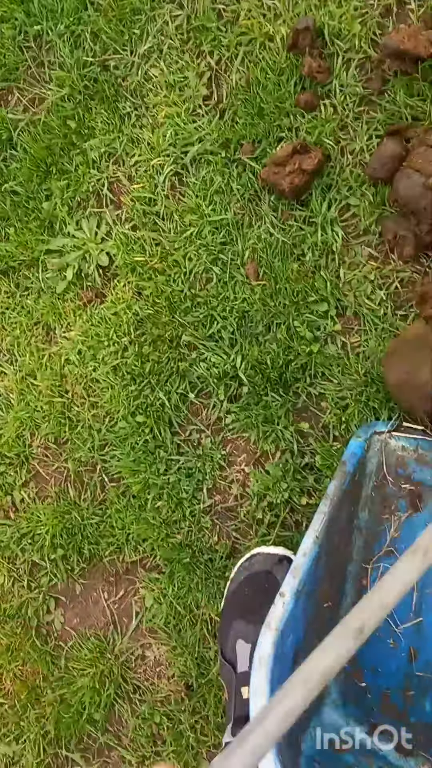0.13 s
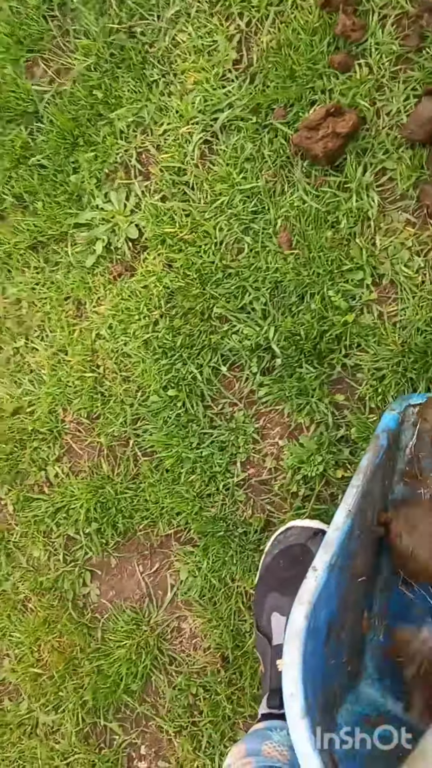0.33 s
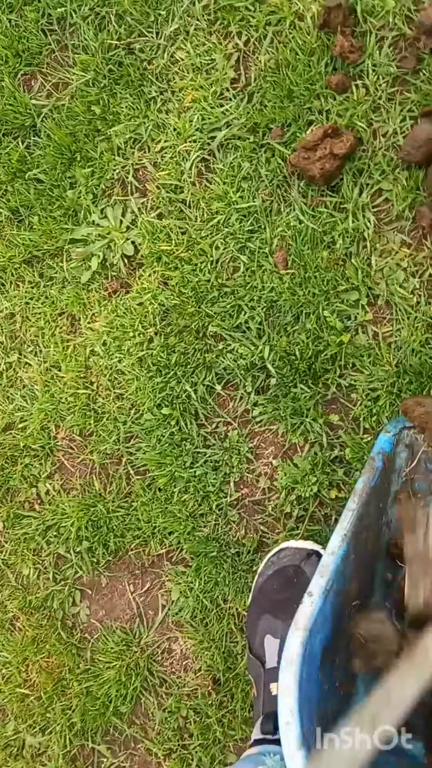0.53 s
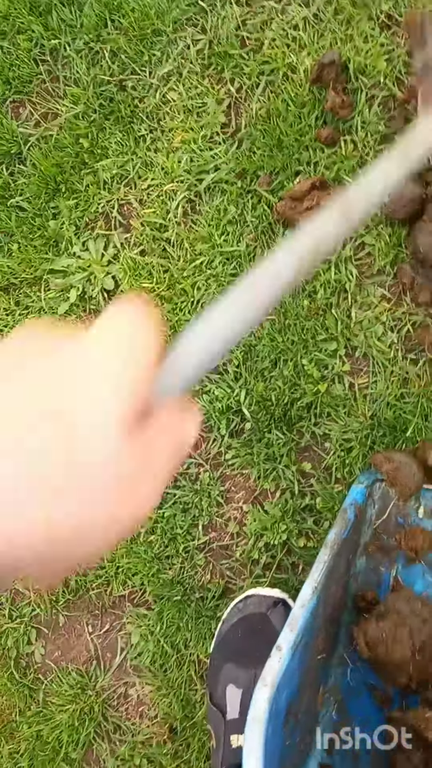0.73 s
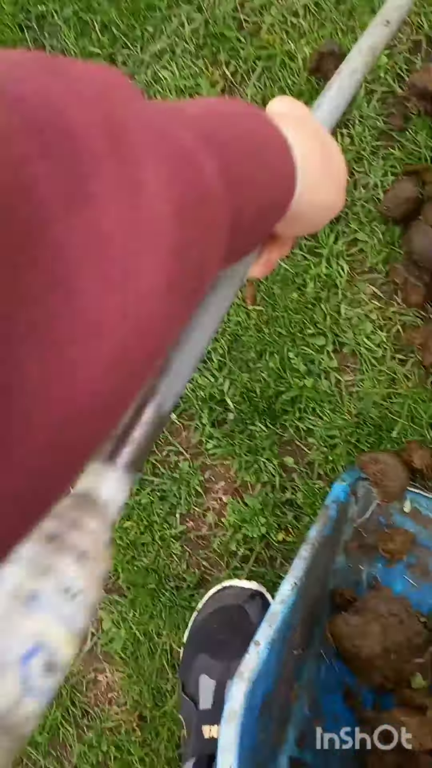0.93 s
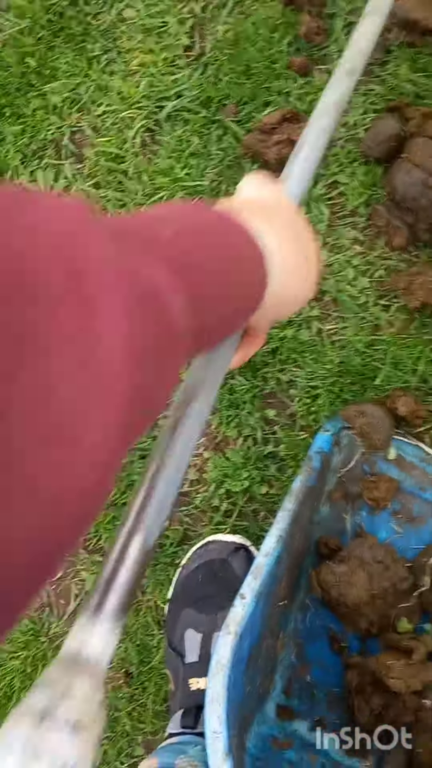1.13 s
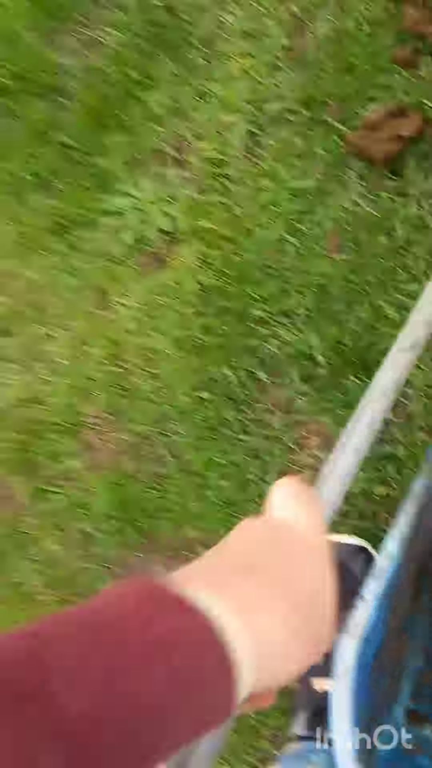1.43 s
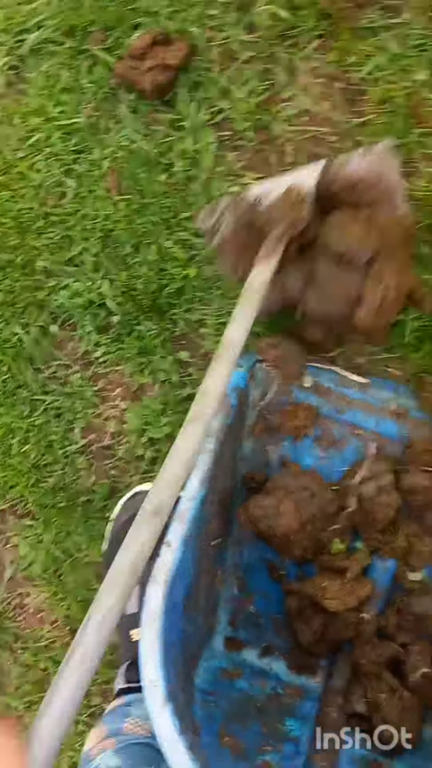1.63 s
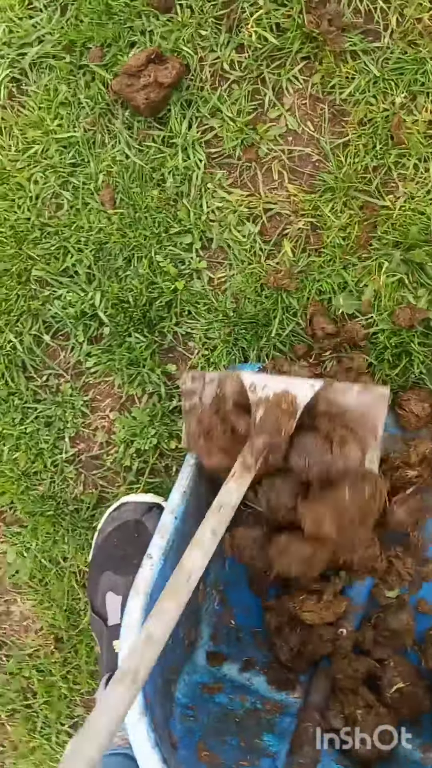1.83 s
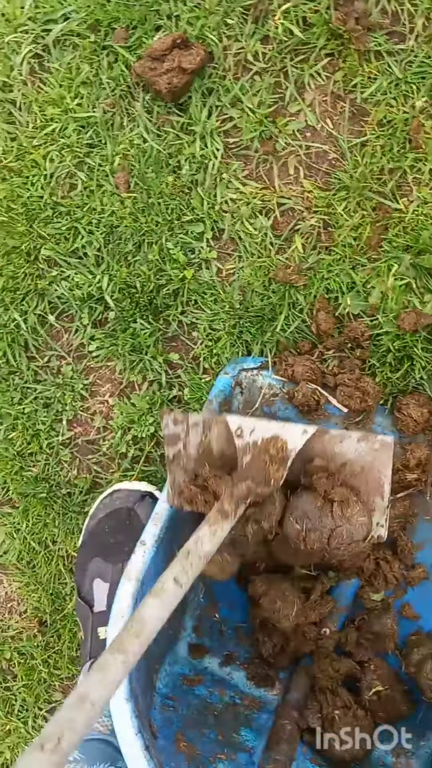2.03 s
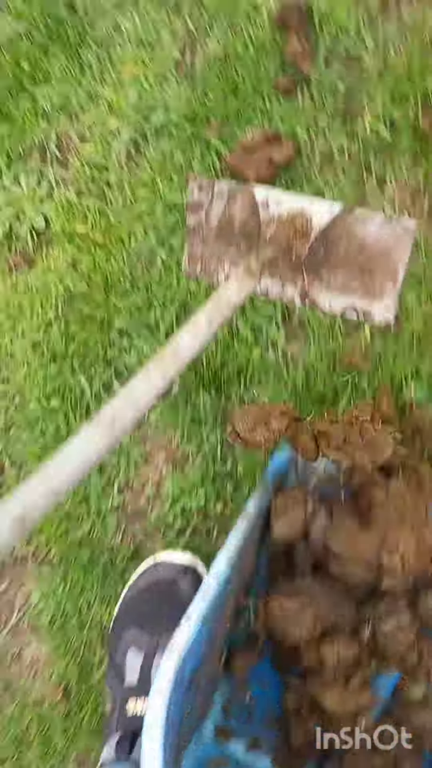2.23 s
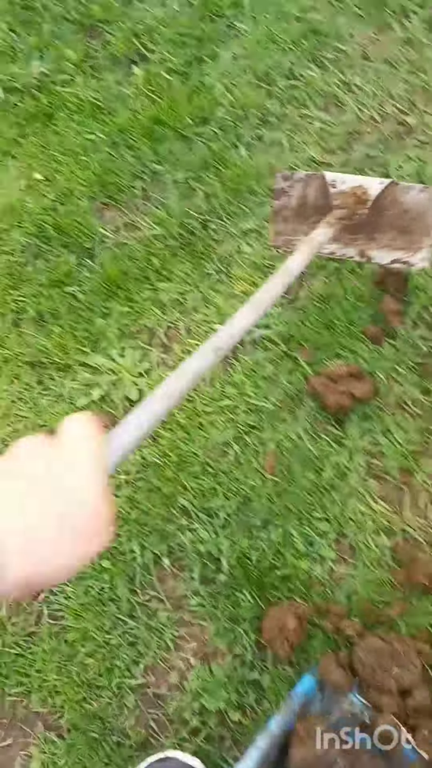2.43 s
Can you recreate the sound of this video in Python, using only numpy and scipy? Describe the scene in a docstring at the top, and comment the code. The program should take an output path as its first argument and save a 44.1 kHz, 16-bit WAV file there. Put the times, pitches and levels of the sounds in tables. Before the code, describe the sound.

Shovelling droppings on grass: dull thuds, crunching stalks, and a gritty metal scrape on a plastic tray

```python
"""Shovelling droppings into a barrow

A metal shovel gathers horse droppings in a field, close to the microphone: damped knocks, noise crumbs and squeaks.
One load slides off and tumbles into a plastic wheelbarrow as sparse coloured clicks; the blade chops into the turf,
drags through the grass, then scrapes over the rim, ringing metal and tray resonances, as the next load drops in.
Shaped noise makes the grass and the wind that buffets the microphone; narrow resonant noise makes a low drone."""
import sys
import numpy as np
from scipy import signal
from scipy.fft import rfft, irfft
from scipy.io import wavfile
from scipy.ndimage import uniform_filter1d

SR = 44100
rng = np.random.default_rng(int(sys.argv[2]) if len(sys.argv) > 2 else 0)


def file_out(sig):
    """Save sig as 16-bit WAV at sys.argv[1]."""
    # one column per channel
    cols = np.atleast_2d(sig).T
    # limit, then scale
    lim = np.clip(cols, -1, 1)
    pcm = np.round(lim * 32767).astype(np.int16)
    wavfile.write(sys.argv[1], SR, pcm)


N = 114660

# spectrum of crumbling earth and rolling clods: frequency_hz, level_db
CRUMBLE_SPECTRUM = [(60, -35), (130, 3.5), (460, -1), (700, -9), (950, -24.5), (1600, -23), (2400, -32),
                    (5000, -81)]
# resonances of the metal blade: frequency_hz, width_hz, level_db
BLADE_MODES = [(765, 55, 2.5), (950, 70, 2), (1060, 55, -1), (1205, 50, 0), (1368, 55, 3), (1600, 38, 1),
               (1880, 170, -9), (2260, 100, -6.5), (2910, 220, -13), (4430, 150, -16), (8670, 400, -25)]
# likeness of the two ports: 1 is identical, 0 is unrelated
LOW_LIKENESS, HIGH_LIKENESS, BLADE_LIKENESS = 0.86, 0.033, 0.13
STALK_ATTACK_S, STALK_PAN_DB = 0.0008, -4


def from_db(db):
    """Decibels to an amplitude factor."""
    return 10 ** (np.asarray(db) / 20)


def rms_one(x):
    """Scale to an rms of 1."""
    return x / np.sqrt(np.mean(x ** 2) + 1e-20)


def level(rows):
    """Gain over time from (s, dB) points; silent outside them."""
    return from_db(np.interp(np.arange(N) / SR, *np.transpose(rows), left=-np.inf, right=-np.inf))


def lasting(rows):
    """Gain over time from (s, dB) points; the end values hold outside them."""
    return from_db(np.interp(np.arange(N) / SR, *np.transpose(rows)))


def burst(start, attack_s, t60):
    """A quick linear rise and an exponential decay that loses 60 dB in t60 seconds."""
    age = np.maximum(np.arange(N) / SR - start, 0)
    return np.minimum(age / attack_s, 1) * np.exp(-np.log(1000) * age / t60)


def pan(db):
    """Left and right gains of equal total power; positive leans left."""
    return rms_one(from_db([[db / 2], [-db / 2]]))


def stereo(pair, likeness):
    """Two unrelated signals become a partly alike left and right."""
    c = np.clip(likeness, -1, 1)
    shared = np.sqrt((1 + c) / 2) * pair[0]
    opposed = np.sqrt((1 - c) / 2) * pair[1] * [[1], [-1]]
    return shared + opposed


def shape(x, spectrum):
    """Filter by a table of (Hz, dB), interpolated over log frequency."""
    hz, db = np.transpose(spectrum)
    f = np.maximum(np.fft.rfftfreq(N, 1 / SR), 1)
    gain = from_db(np.interp(np.log(f), np.log(hz), db))
    return irfft(rfft(x) * gain, N)


def colour(x, spectrum):
    """Give a steady texture its spectrum; rms 1."""
    return rms_one(shape(x, spectrum))


def even(x, window_s):
    """Hold a texture's short-term level at 1."""
    power = uniform_filter1d(np.mean(x ** 2, axis=0), max(int(window_s * SR), 2))
    return x / np.sqrt(power + 1e-9)


def grains(per_s, spread_db, likeness):
    """Random tiny clicks of uneven size, heard at both ports; rms 1."""
    present = rng.random(N) < per_s / SR
    sizes = present * from_db(spread_db * np.minimum(rng.exponential(1, N), 4))
    return rms_one(stereo(sizes * rng.standard_normal((2, N)), likeness))


def resonate(x, modes):
    """Parallel resonances of alternating sign."""
    out = 0
    for k, (hz, width_hz, db) in enumerate(modes):
        r = np.exp(-np.pi * width_hz / SR)  # pole radius: a wider resonance dies sooner
        poles = [1, -2 * r * np.cos(2 * np.pi * hz / SR), r * r]
        ring = signal.lfilter([1, 0, -1], poles, x + 1e-18)
        out = out + (-1) ** k * from_db(db) * (1 - r * r) / 2 * ring
    return out


def lurch(per_s):
    """A random zigzag of about unit size."""
    at = np.arange(N) / SR * per_s
    knots = rng.standard_normal(int(at[-1]) + 2)
    return np.interp(at, np.arange(len(knots)), knots)


def wander():
    """A gain that lurches at random; rms 1."""
    shifts_per_s, shift_db = 70, 4
    return rms_one(from_db(shift_db * lurch(shifts_per_s)))


def gliding(x, hz, width_hz):
    """One resonance whose centre follows hz over time."""
    turn = np.exp(2j * np.pi * np.cumsum(hz) / SR)
    r = np.exp(-np.pi * width_hz / SR)
    # shift the centre to zero, smooth there, then shift back
    smoothed = signal.lfilter([1 - r], [1, -r], x / turn + 1e-18)
    return np.real(turn * smoothed)


def sliding(x, modes):
    """Modes under a moving contact: each bends in pitch, swells and fades on its own."""
    bends_per_s, bend_share = 35, 0.022  # share of the mode's pitch
    out = 0
    for k, (hz, width_hz, db) in enumerate(modes):
        pitch = hz * (1 + bend_share * lurch(bends_per_s))
        out = out + (-1) ** k * from_db(db) * wander() * gliding(x, pitch, width_hz)
    return out


def field():
    """Gusts of low noise on each port, a narrow resonance of noise as the drone, and faint open air."""
    # wind on each microphone port: time_s, level_db
    wind_left = [(.31, -95), (.36, -25.5), (.42, -35), (.54, -70), (1.17, -45), (1.645, -43),
                 (1.675, -26.5), (1.71, -48), (1.93, -30.5), (2.06, -46), (2.29, -34.5), (2.335, -20.5),
                 (2.39, -45), (2.6, -63)]
    wind_right = [(0, -59), (.36, -42.5), (.54, -56), (.82, -79), (0.987, -33), (1.13, -32), (1.33, -50.5),
                  (1.46, -33), (1.88, -41), (1.986, -35.5), (2.04, -46.5), (2.6, -60)]
    # wind rumble: frequency_hz, level_db
    wind_spectrum = [(45, -3), (75, 2.5), (110, -2), (150, -10), (230, -17.5), (400, -41), (1500, -82)]
    # open air: frequency_hz, level_db
    air_spectrum = [(60, 15.5), (300, -1), (600, -12), (1300, -10.5), (2500, -26.5), (5500, -55),
                    (8000, -22), (16000, -51)]
    drone_hz, stage_width_hz, drone_db, air_db = 72.24, 5.3, -47, -54.5
    gusts = []
    for rows in (wind_left, wind_right):
        rumble = even(colour(rng.standard_normal((1, N)), wind_spectrum), 0.049)
        gusts.append(lasting(rows) * rumble[0])
    band = [(drone_hz, stage_width_hz, 0)]
    # an extra second lets the resonances build up before the scene starts
    run_in = resonate(resonate(rng.standard_normal((1, N + SR)), band), band)
    drone = from_db(drone_db) * even(run_in[:, SR:], 0.0834)
    air = from_db(air_db) * colour(stereo(rng.standard_normal((2, N)), 0.18), air_spectrum)
    return np.array(gusts) + drone + air


def grass():
    """Click textures crunch as crushed stalks and rustle along the blade; noise hisses for slip and swing."""
    # grass brushing the blade: time_s, level_db
    rustle_points = [(0, -59), (.11, -51), (.17, -61), (.29, -58.5), (.36, -47.5), (.45, -60.5), (.63, -53),
                     (.675, -55.5), (.72, -67), (.795, -52.5), (.82, -64), (.98, -47.5), (1.04, -72),
                     (1.13, -66), (1.19, -51), (1.34, -56.5), (1.66, -57.5), (1.9, -46), (1.97, -72.5),
                     (2.15, -67), (2.6, -68.5)]
    # brushed grass: frequency_hz, level_db
    grass_spectrum = [(700, -5), (1500, 2.5), (2400, -13), (4000, -7.5), (6200, -9.5), (7600, -1.5),
                      (10000, -4.5), (12300, -0.5), (15800, -1)]
    # stalks crushed: start_s, level_db, t60_s
    crunches = [(0.125, -43, 0.044), (0.658, -45, 0.16), (0.856, -30, 0.11), (0.898, -26, 0.13),
                (0.917, -32, 0.058), (1.17, -43.5, 0.14), (1.728, -31.5, 0.12), (2.169, -52, 0.058),
                (2.356, -49, 0.05)]
    # crushed stalks: frequency_hz, level_db
    crunch_spectrum = [(500, -9), (1500, -0.5), (2600, -14.5), (4200, -1.5), (6000, -4.5), (8000, -0.5),
                       (10700, -4), (12100, 6.5), (15800, -6)]
    # the load slipping off the blade: time_s, level_db
    slip_points = [(1.678, -72), (1.692, -42.5), (1.735, -36), (1.8, -49)]
    # slipping load: frequency_hz, level_db
    slip_spectrum = [(1500, -9), (3500, -12), (7500, 3.5), (10000, -1), (12500, 6.5), (15800, 6)]
    # the blade swinging out over the grass again: time_s, level_db
    swish_points = [(2.44, -83), (2.48, -72.5), (2.55, -63), (2.6, -55.5)]
    # swinging blade: frequency_hz, level_db
    swish_spectrum = [(2500, -0.5), (3400, 7.5), (5500, -3), (7700, 15), (10000, -0.5)]
    grass_pan_db, slip_pan_db = -4, -12

    fine = grains(20000, 2.2, HIGH_LIKENESS)
    sparse = from_db(-6) * grains(230, 0.67, HIGH_LIKENESS)
    rustle = lasting(rustle_points) * pan(grass_pan_db) * colour(fine + sparse, grass_spectrum)

    crunch_gain = sum(from_db(db) * burst(s, STALK_ATTACK_S, t60) for s, db, t60 in crunches)
    crushing = even(colour(grains(20000, 1.4, HIGH_LIKENESS), crunch_spectrum), 0.035)
    crunch = crunch_gain * pan(STALK_PAN_DB) * crushing

    hiss = colour(rng.standard_normal((2, N)), slip_spectrum)
    slip = level(slip_points) * pan(slip_pan_db) * hiss

    onset = burst(swish_points[0][0], STALK_ATTACK_S, np.inf)  # silent before the swing, no decay
    swish = lasting(swish_points) * onset * colour(rng.standard_normal((2, N)), swish_spectrum)
    return rustle + crunch + slip + swish


def squeaks():
    """Dung and stalks stick and slip on the metal: short swells of a narrow, sometimes gliding resonance."""
    # stick-slip squeaks on the blade: peak_s, length_s, level_db, pitch_hz, glide_hz_per_s, width_hz
    slips = [(0.1, .15, -47.5, 1680, 0, 600), (0.13, .1, -49.5, 1598, 0, 25),
             (0.395, .06, -64, 2480, -24000, 280), (1.196, .045, -55, 2920, 0, 170),
             (1.57, .04, -57, 1380, 0, 140)]
    t, out = np.arange(N) / SR, 0
    for s, length, db, hz, hz_per_s, width_hz in slips:
        age = np.clip(t - s, -length / 2, length / 2)
        pitch = hz + hz_per_s * age
        friction = stereo(rng.standard_normal((2, N)), BLADE_LIKENESS)
        tone = even(gliding(gliding(friction, pitch, width_hz), pitch, width_hz), length / 2)
        swell = np.cos(np.pi * age / length) ** 2
        out = out + from_db(db) * swell * tone
    return out


def tumble():
    """Small clods roll and slide down inside the tray: sparse clicks with an earthy spectrum."""
    # clods rolling in the tray: time_s, level_db
    tumble_points = [(.17, -52), (.23, -49), (.36, -46.5), (.47, -52.5), (.555, -93), (.58, -43),
                     (.62, -52), (.69, -46.5), (.78, -74)]
    return level(tumble_points) * pan(-5) * colour(grains(1500, 2.8, LOW_LIKENESS), CRUMBLE_SPECTRUM)


def thuds():
    """Each blow is a damped low knock with a short spill of crumbling earth."""
    # dull blows of blade and clods: start_s, level_db, pitch_hz, ring_t60_s, crumbling_db
    blows = [(0.358, -34, 420, .07, -42), (0.443, -39, 400, .05, -45), (0.636, -29, 595, .04, -39),
             (0.664, -32, 229, .07, -41), (0.8575, -11.5, 435, .04, -28), (0.8665, -20, 330, .045, -34),
             (0.8985, -11.5, 300, .033, -28), (0.9022, -18, 430, .035, -38), (1.163, -29, 280, .04, -35),
             (1.7435, -11, 275, .04, -25), (1.812, -20, 430, .06, -36), (1.850, -15, 440, .04, -36),
             (1.887, -21, 460, .05, -36), (2.170, -37, 280, .06, -44), (2.357, -17, 470, .026, -35),
             (2.3605, -20, 230, .04, -44)]
    # partials of a blow: multiple of its pitch, level_db
    partials = [(0.429, -5.5), (1.002, 2), (1.56, -10.5)]
    crumble_attack_s, crumble_t60_s, thud_pan_db = 0.00059, 0.11, -0.5
    crumbs = even(colour(grains(6000, 2.37, LOW_LIKENESS), CRUMBLE_SPECTRUM), 0.0089)
    t, out = np.arange(N) / SR, 0
    for s, db, hz, t60, crumble_db in blows:
        tone = sum(from_db(part_db) * np.sin(2 * np.pi * multiple * hz * (t - s))
                   for multiple, part_db in partials)
        knock = from_db(db) * burst(s, 0.0017, t60) * tone
        spill = from_db(crumble_db) * burst(s, crumble_attack_s, crumble_t60_s) * crumbs
        out = out + knock + spill
    return pan(thud_pan_db) * out


def snaps():
    """Thin ticks of grass springing back: short decays of high-passed noise."""
    # single blades of grass flick: start_s, level_db
    flicks = [(0.545, -32), (0.562, -31), (2.036, -50), (2.133, -42), (2.39, -44), (2.465, -45)]
    t60_s, low_cut_hz = 0.02, 7000
    high_pass = signal.butter(4, low_cut_hz, "high", fs=SR, output="sos")
    fizz = signal.sosfilt(high_pass, rng.standard_normal((2, N)))
    gain = sum(from_db(db) * burst(s, STALK_ATTACK_S, t60_s) for s, db in flicks)
    return pan(STALK_PAN_DB) * fizz * gain


def blade():
    """The blade scratches through the turf as shifting resonances and clanks when its edge catches."""
    # the edge catching: start_s, strike_db
    catches = [(0.636, -38), (1.7355, -15.5), (1.777, -25), (1.798, -27), (1.826, -25), (1.8925, -19)]
    # the blade dragged through the turf: time_s, level_db
    rub_points = [(.92, -48.5), (1.07, -81.5), (1.16, -76), (1.21, -58.5), (1.35, -71), (1.43, -61.5),
                  (1.5, -73.5), (1.57, -58.5), (1.68, -90)]
    # resonances of the drag: frequency_hz, width_hz, level_db
    drag_modes = [(1320, 210, -5), (1860, 160, -4.5), (2920, 89, -2), (4000, 100, -2.5), (5360, 880, -13)]
    scratches_per_s, scratch_spread_db = 700, 2.5
    clicks = np.zeros(N)
    for s, db in catches:
        clicks[int(s * SR)] = from_db(db)
    clank = resonate(clicks, BLADE_MODES)
    clank = clank * np.max(clicks) / np.max(np.abs(clank))  # peaks as high as the hardest strike
    scratches = grains(scratches_per_s, scratch_spread_db, HIGH_LIKENESS)
    drag = level(rub_points) * pan(6) * even(sliding(scratches, drag_modes), 0.026)
    return clank + drag


def scrape():
    """Coarse grit between blade and rim shakes the blade, sparse separate knocks shake the tray, and all stops
    as the blade lifts."""
    # blade dragged across the rim: time_s, level_db
    scrape_points = [(1.727, -91), (1.731, -32.5), (1.742, -27), (1.764, -34.5), (1.79, -35.5),
                     (1.838, -30.5), (1.868, -34), (1.897, -33.5), (1.915, -48.5), (1.98, -70)]
    # grit: frequency_hz, level_db
    grit_spectrum = [(500, -8), (2200, 8), (3000, 11), (3600, -13), (4600, 6.5), (15800, -6.5)]
    # resonances of the plastic tray: frequency_hz, width_hz, level_db
    tray_modes = [(97, 133, -9.5), (237, 8.3, 3.5), (306, 36, -21.5), (377, 33.6, 3.5), (460, 59, -1.5)]
    grit_per_s, grit_spread_db = 3000, 2.8
    tray_db, grit_db = 4.5, -15  # relative to the scraping blade
    grit = even(grains(grit_per_s, grit_spread_db, BLADE_LIKENESS), 0.01)
    metal = even(sliding(grit, BLADE_MODES), 0.043)
    judder = even(resonate(grains(500, 0.48, LOW_LIKENESS), tray_modes), 0.024)
    rasp = np.sqrt(wander()) * colour(grit, grit_spectrum)
    return level(scrape_points) * (metal + from_db(tray_db) * judder + from_db(grit_db) * rasp)


def scene():
    """Field, grass, shovel and barrow together."""
    return field() + grass() + squeaks() + tumble() + thuds() + snaps() + blade() + scrape()


def record(dry):
    """The two ports differ in colour and shed the deepest bass; the top is cut steeply."""
    # colour of the left port against the right: frequency_hz, level_db
    left_port = [(480, -1), (800, -2), (1400, 0), (7000, 4.5), (12000, -2)]
    low_cut_hz, cutoff_hz = 38, 16000
    ports = np.array([shape(dry[0], left_port), dry[1]])
    thinned = signal.sosfilt(signal.butter(4, low_cut_hz, "high", fs=SR, output="sos"), ports)
    return signal.sosfilt(signal.ellip(12, 0.1, 80, cutoff_hz, fs=SR, output="sos"), thinned)


dry = scene()
out = record(dry)
file_out(out)
```